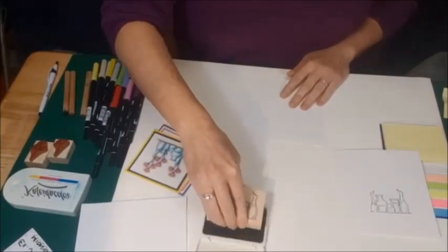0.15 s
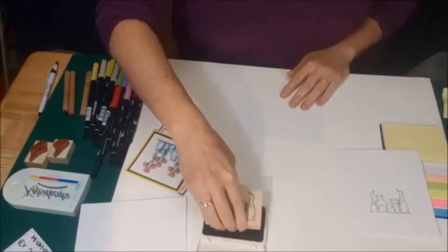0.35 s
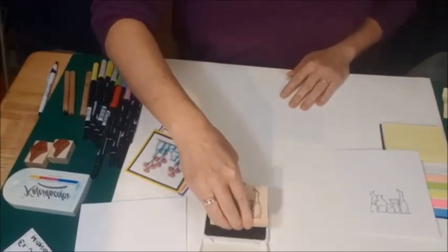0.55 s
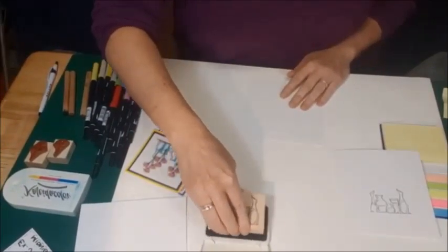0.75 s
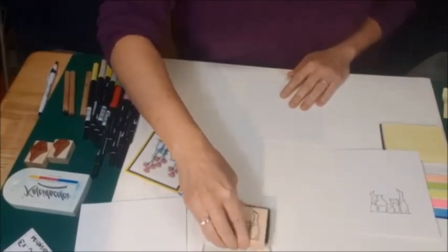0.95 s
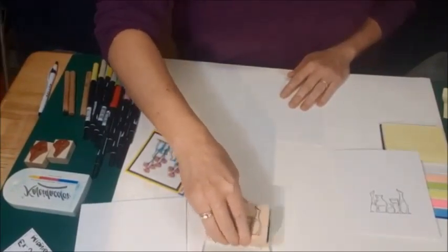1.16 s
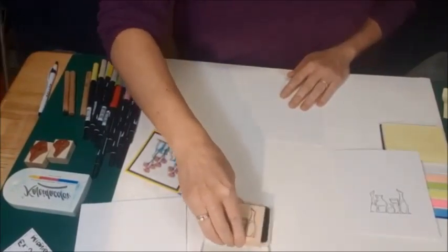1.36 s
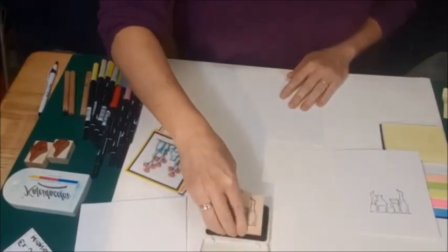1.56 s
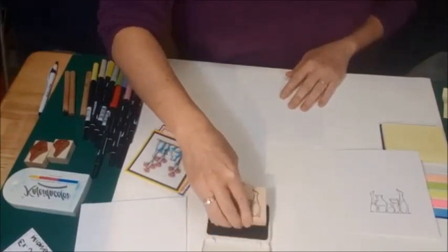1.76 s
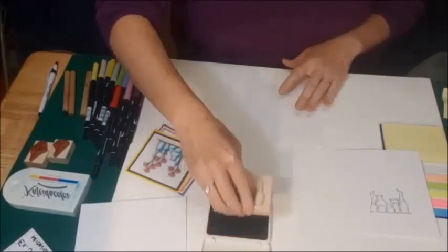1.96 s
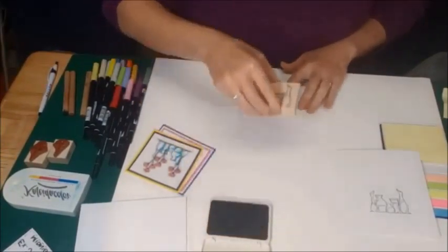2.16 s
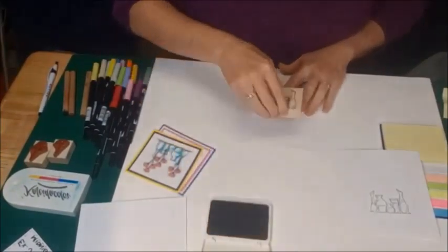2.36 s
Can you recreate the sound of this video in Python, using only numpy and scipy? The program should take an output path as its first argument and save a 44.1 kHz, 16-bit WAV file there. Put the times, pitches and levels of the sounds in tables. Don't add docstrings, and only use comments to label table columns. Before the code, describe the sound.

A wooden rubber stamp hits an ink pad on a light table seven times, about every 0.3 seconds from 0.05 to 1.7. The first knock is sharpest and loudest, the third and fourth softer and more thuddy, the later ones firm. Each has a boomy low thud, dull slap and brief rattle. Very faint peeling at 1.8 and paper brushing near 2.1 follow, over quiet room hum and hiss.

```python
import sys
import numpy as np
from scipy import signal
from scipy.fft import rfft, irfft
from scipy.io import wavfile
from scipy.ndimage import uniform_filter1d

SR = 44100
rng = np.random.default_rng(int(sys.argv[2]) if len(sys.argv) > 2 else 0)


def gain_from_db(level_db):
    decades = np.asarray(level_db, float) / 20
    return 10 ** decades


def to_wav(sig):
    pcm = np.clip(np.atleast_2d(sig), -1, 1) * 32767
    pcm = np.round(pcm).astype(np.int16)
    wavfile.write(sys.argv[1], SR, pcm.T)


N = 106854

# start in seconds, knock level in dB, knock centre in Hz,
# thud of legs and frame in dB, boom of the table top in dB.
TAPS = [
    (.045, -8.5, 749.6, -15, -19),
    (.337, -17, 677, -19, -28),
    (.633, -27, 907, -16.5, -26.5),
    (0.924, -34, 834, -17.5, -24.5),
    (1.213, -15.5, 623, -18.5, -29.5),
    (1.470, -14.5, 650, -18, -32.5),
    (1.7014, -18, 759, -18, -28.5),
]
# case ringing in dB, hard edge in dB, slap in dB.
LANDINGS = [(-53, -29, -27), (-73.5, -30.5, -41), (-68, -31, -33.5), (-64, -34, -33.5), (-64, -42, -39),
            (-59.5, -35, -37), (-58.5, -35.5, -35.5)]
# frequency in Hz, level in dB, t60 in seconds, sense (+1 or -1).
LEG_MODES = [(43.1, -5.5, 0.33, -1), (65.3, -1.15, 0.11, 1)]
# frequency in Hz, level in dB, t60 in seconds, sense (+1 or -1).
FRAME_MODES = [(104.5, -13, 0.056, 1), (142.9, -12.5, 0.15, 1), (190.6, -12.5, 0.074, -1)]
# frequency in Hz, level in dB, t60 in seconds, sense (+1 or -1).
TOP_MODES = [(248.6, -2, 0.044, 1), (286.4, -2, 0.096, -1), (320.4, -3.5, 0.071, 1),
             (383.4, -12.5, 0.21, 1), (427.4, -9, .07, -1), (471.7, -8, 0.13, -1)]
# frequency in Hz, level in dB, t60 in seconds, sense (+1 or -1).
CASE_MODES = [(559.2, -3.5, 0.1307, 1), (608, -7.5, 0.097, -1), (647, -2, .07, -1), (685, -8.5, 0.11, 1),
              (740.7, -7, .06, -1), (908, -12, .05, -1), (968, -6, 0.11, 1), (1090, 0.5, 0.036, -1),
              (1110, -8, 0.038, 1), (1172, -16.5, 0.017, -1), (1318, -12.5, 0.064, 1),
              (1450, -10.5, 0.046, -1), (2020, -16.5, .035, 1), (2264, -16, 0.021, -1)]
# frequency in Hz, level in dB per Hz.
SLAP_SPECTRUM = [(300, -24), (600, -5.5), (1200, -3.5), (1900, -14.5), (2600, -21), (4400, -30.5),
                 (8000, -37), (14000, -42)]
# start in seconds, level in dB, length in seconds,
# brightness in dB per octave.
RATTLES = [(.080, -28.5, 0.0064, 1.06), (0.097, -40.5, 0.016, -2.5), (0.369, -33.5, 0.0096, -3.6),
           (0.393, -41, 0.012, -1.8), (0.668, -31.5, 0.0097, -0.54), (0.69, -39.5, 0.008, 0),
           (0.954, -39.5, 0.0038, -8), (0.977, -38, 0.0064, 0.6), (1.244, -40.5, 0.0092, -2.5),
           (1.271, -39, 0.0045, 1.9), (1.502, -34.5, 0.004, -2.5), (1.525, -35.5, 0.0047, -0.2),
           (1.732, -33.5, 0.018, 0.64), (1.759, -43, 0.0082, 2.7)]
# frequency in Hz, level in dB per Hz.
RATTLE_SPECTRUM = [(500, -28.5), (1000, -1), (1400, -3.5), (2150, -1.5), (2900, -7), (4000, -8),
                   (6000, -20), (11300, -26.5), (14500, -37)]
# centre in seconds, rise in seconds, fall in seconds, level in dB,
# tilt in dB per octave.
STROKES = [
    (1.822, 0.034, 0.034, -68, 7),
    (2.081, .008, .04, -75.5, -3),
    (2.174, .05, .045, -69.5, -2),
]
# frequency in Hz, level in dB per Hz.
BRUSH_SPECTRUM = [(1180, -41), (2000, -17), (3030, -13), (3570, -17), (3880, -11), (8390, -6),
                  (14500, -4.5)]
# frequency in Hz, level in dB per Hz.
FLOOR_SPECTRUM = [(20, -35), (60, -2), (90, -7.5), (310, -17), (420, -27), (800, -31.5), (2200, -46),
                  (10000, -63.5), (12500, -48)]

TOP_LAG_S = 0.0026
LEG_CONTACT_HZ, TABLE_CONTACT_HZ, EDGE_CONTACT_HZ = 400, 1300, 3800
NUDGE_S, NUDGE_DB = 2.098, -56
KNOCK_S = 0.0071
SLAP_T60_S, SLAP_RISE_S = 0.14, 0.0079
RATTLE_PER_S, RATTLE_SPREAD_DB, RATTLE_CYCLES = 30000, 2.6, 21
RATTLE_RISE_S, RATTLE_FALL_S = 0.00251, 0.0075
ROOM_T60_S, ROOM_HIGH_T60_S, WALL_CUT_HZ, FIRST_ECHO_S = 0.23, 0.18, 880, 0.005
ROOM_DB, THUD_ROOM_DB = -4.5, 1.5
HUM_HZ, HUM_DB, HUM_WIDTH_HZ = 59.5, -62.5, 3.7
WHINE_HZ, WHINE_DB, WHINE_WIDTH_HZ = 1520, -90.5, 120
FLOOR_DB, HISS_DB = -60.5, -87.0
MIC_CUT_HZ = 14400


def table_thud():
    s, _, _, thud_db, _ = np.transpose(TAPS)
    leg_forces = [soft(LEG_CONTACT_HZ)] * (len(s) + 1)
    legs = struck(LEG_MODES, np.r_[s, NUDGE_S], np.r_[thud_db, NUDGE_DB], leg_forces, spread_db=0.56)
    frame_forces = [soft(TABLE_CONTACT_HZ)] * len(s)
    frame = struck(FRAME_MODES, s + TOP_LAG_S, thud_db, frame_forces, spread_db=2.45)
    return legs + frame


def table_top():
    s, _, _, _, top_db = np.transpose(TAPS)
    forces = [soft(TABLE_CONTACT_HZ)] * len(s)
    return struck(TOP_MODES, s + TOP_LAG_S, top_db, forces, spread_db=5.0)


def knock_and_case():
    s, knock_db, centre_hz, _, _ = np.transpose(TAPS)
    ring_db, edge_db, _ = np.transpose(LANDINGS)
    u = np.arange(int(KNOCK_S * SR)) / SR
    window = np.sin(np.pi * u / KNOCK_S) ** 2
    chatter = [window * np.sin(-2 * np.pi * hz * u) for hz in centre_hz]
    knock = np.zeros(N)
    for start, db, c in zip((s * SR).astype(int), knock_db, chatter):
        knock[start:start + len(c)] += gain_from_db(db) * c
    edge = np.roll(soft(EDGE_CONTACT_HZ)[:len(u)], len(u) // 3)
    forces = [gain_from_db(r) * c + gain_from_db(e) * edge for c, r, e in zip(chatter, ring_db, edge_db)]
    return knock + struck(CASE_MODES, s, 0 * s, forces, spread_db=2.5)


def slap():
    t = np.arange(N) / SR
    envelope = 0
    for tap, landing in zip(TAPS, LANDINGS):
        since = t - tap[0]
        decay = gain_from_db(landing[2] - 60 * np.maximum(since, 0) / SLAP_T60_S)
        envelope = envelope + decay * np.clip(since / SLAP_RISE_S + 0.5, 0, 1) ** 2
    return envelope * coloured(rng.standard_normal(N), SLAP_SPECTRUM)


def struck(modes, s, db, forces, spread_db):
    out = 0
    starts = (np.asarray(s) * SR).astype(int)
    for hz, level_db, t60, sense in modes:
        drive = np.zeros(N)
        gains = gain_from_db(db + level_db + spread_db * rng.standard_normal(len(s)))
        for start, gain, force in zip(starts, gains, forces):
            drive[start:start + len(force)] = gain * force
        out = out + np.sign(sense) * ring(drive, hz, t60)
    return out


def soft(hz):
    t = np.arange(SR // 50) / SR
    force = t * np.exp(-2 * np.pi * hz * t)
    return force / force.sum()


def ring(clicks, hz, t60):
    r = gain_from_db(-60 / (t60 * SR))
    w = 2 * np.pi * hz / SR
    return signal.lfilter([0, np.sin(w)], [1, -2 * r * np.cos(w), r * r], clicks + 1e-18)


def rattles():
    t = np.arange(N) / SR
    sizes = gain_from_db(RATTLE_SPREAD_DB * np.minimum(rng.exponential(1, N), 4))
    sizes = sizes * rng.choice([-1, 1], N) * (rng.random(N) < RATTLE_PER_S / SR)
    pitches = np.geomspace(800, 14000, num=28)
    dealt = rng.integers(0, len(pitches), N)
    bursts = []
    for s, db, length, _ in RATTLES:
        rise = np.clip((t - s) / RATTLE_RISE_S, 0, 1)
        fall = np.exp(-np.maximum(t - s - length, 0) / RATTLE_FALL_S)
        bursts.append(gain_from_db(db) * rise * fall)
    norm = np.sqrt(np.sum(gain_from_db(2 * at_hz(RATTLE_SPECTRUM, pitches)) * pitches) / len(pitches))
    out = 0
    for k, hz in enumerate(pitches):
        shape = sum(b * gain_from_db(row[3] * np.log2(hz / 2000)) for b, row in zip(bursts, RATTLES))
        unit = np.sqrt(RATTLE_PER_S / len(pitches) * RATTLE_CYCLES / hz / 14) * hz ** -0.5 * norm * 8
        ringing = ring(sizes * shape * (dealt == k), hz, RATTLE_CYCLES / hz)
        out = out + ringing * gain_from_db(at_hz(RATTLE_SPECTRUM, hz)) / unit
    return out


def brushing():
    t = np.arange(N) / SR
    out = 0
    for s, rise, fall, db, tilt_db in STROKES:
        colour = [(hz, v + tilt_db * np.log2(hz / 8000)) for hz, v in BRUSH_SPECTRUM]
        roughness_db = 1.5 * uniform_filter1d(rng.standard_normal(N), size=100) * 10
        grain = rng.standard_normal(N) * gain_from_db(roughness_db)
        swell = np.exp(-((t - s) / np.where(t < s, rise, fall)) ** 2 / 2)
        out = out + gain_from_db(db) * swell * coloured(grain, colour)
    return out


def room(x):
    t = np.arange(SR // 2) / SR
    noise = rng.choice([-1, 1], len(t)) * np.clip(t / FIRST_ECHO_S - 1, 0, 1)
    low = signal.sosfilt(signal.butter(1, WALL_CUT_HZ, fs=SR, output="sos"), noise)
    reply = low * gain_from_db(-60 * t / ROOM_T60_S) + (noise - low) * gain_from_db(-60 * t / ROOM_HIGH_T60_S)
    return signal.fftconvolve(x, reply / np.sqrt(SR / 50))[:N]


def hum_and_whine():
    t = np.arange(N) / SR
    hum = rms_one(np.sin(2 * np.pi * HUM_HZ * t) + 0.46 * narrow(HUM_HZ, HUM_WIDTH_HZ))
    return gain_from_db(HUM_DB) * hum + gain_from_db(WHINE_DB) * narrow(WHINE_HZ, WHINE_WIDTH_HZ)


def narrow(hz, width_hz):
    t60 = 2.2 / width_hz
    return rms_one(ring(ring(rng.standard_normal(N), hz, t60), hz, t60))


def room_floor():
    return gain_from_db(FLOOR_DB) * coloured(rng.standard_normal(N), FLOOR_SPECTRUM)


def coloured(x, spectrum):
    hz = np.maximum(np.arange(N // 2 + 1) * SR / N, 1)
    gain = gain_from_db(at_hz(spectrum, hz)) * (hz > spectrum[0][0] / 2)
    return rms_one(irfft(rfft(x) * gain, N))


def at_hz(points, hz):
    known_hz, known_db = np.transpose(points)
    return np.interp(np.log(hz), np.log(known_hz), known_db)


def rms_one(x):
    return x / np.sqrt(np.mean(x ** 2) + 1e-20)


def scene():
    thud = table_thud()
    near = table_top() + knock_and_case() + slap() + rattles()
    echoes = gain_from_db(ROOM_DB) * room(near + gain_from_db(THUD_ROOM_DB) * thud)
    background = brushing() + hum_and_whine() + room_floor()
    return (thud + near + echoes + background)[None]


def band_limit(x):
    return signal.sosfilt(signal.butter(12, 15600, fs=SR, output="sos"), x)


def record(dry):
    cut = signal.sosfilt(signal.cheby2(10, 30, MIC_CUT_HZ, fs=SR, output="sos"), dry)
    mix = cut + gain_from_db(HISS_DB) * rng.standard_normal(dry.shape)
    return band_limit(mix)


dry = scene()
out = record(dry)
to_wav(out)
```